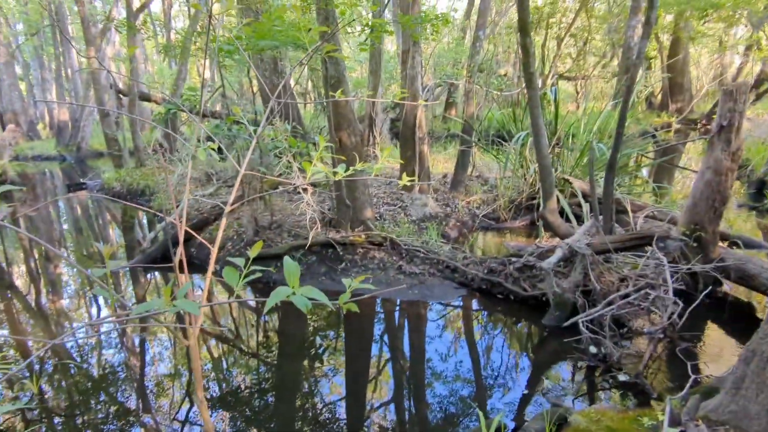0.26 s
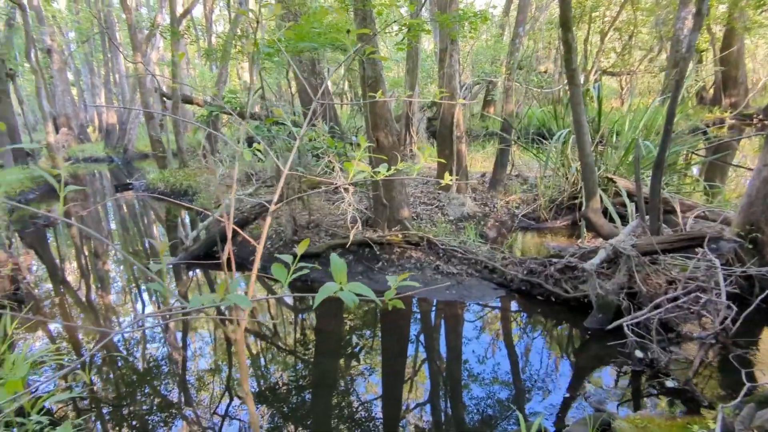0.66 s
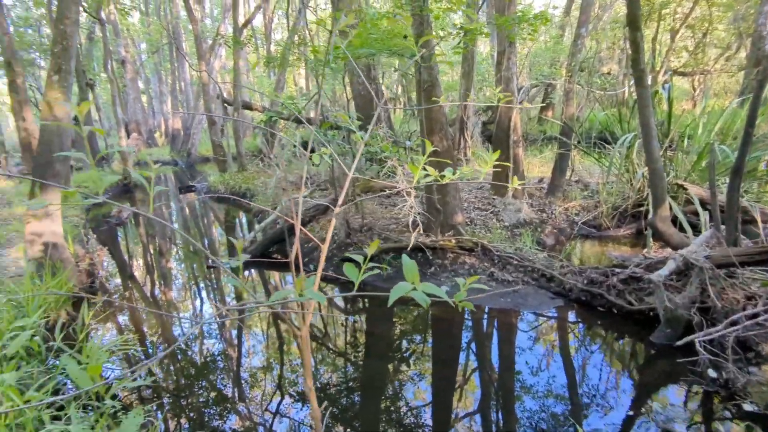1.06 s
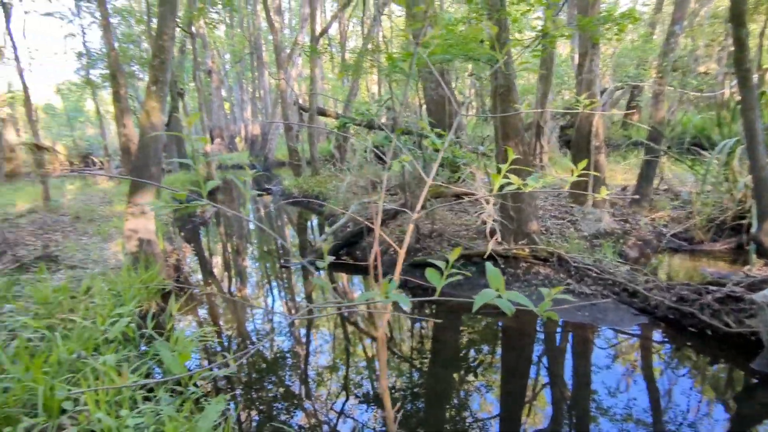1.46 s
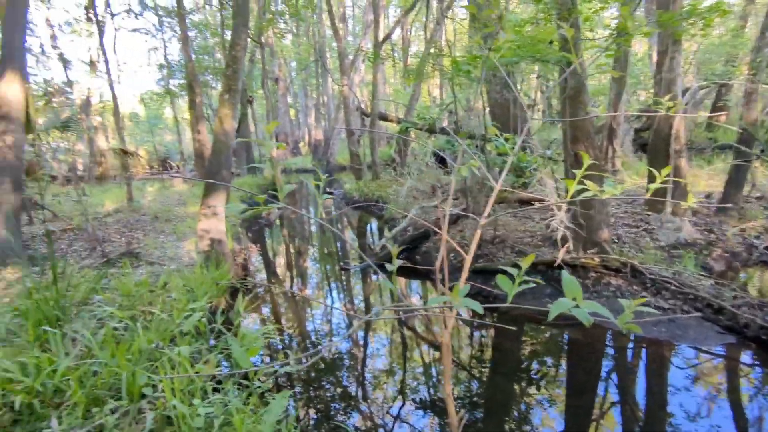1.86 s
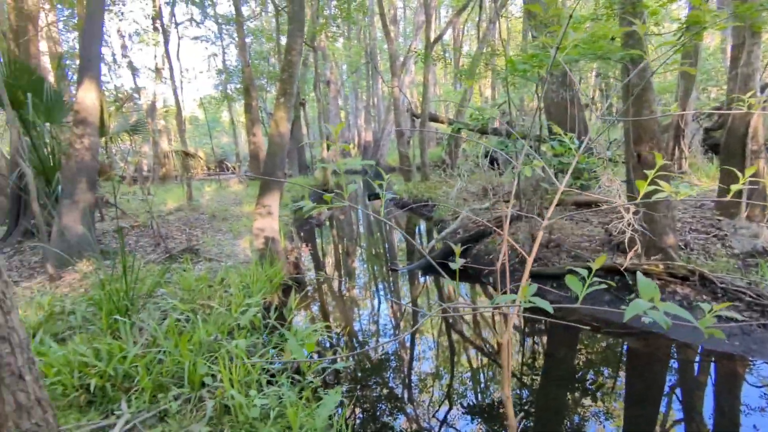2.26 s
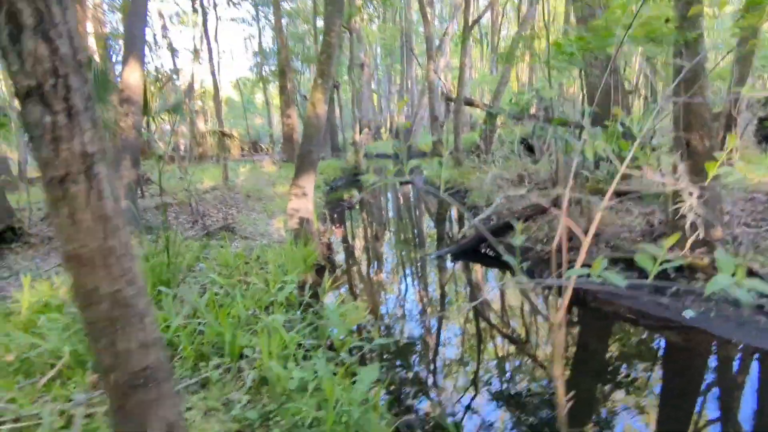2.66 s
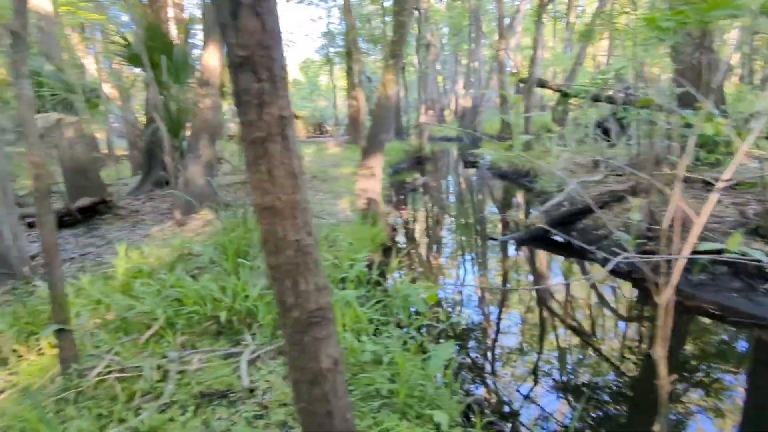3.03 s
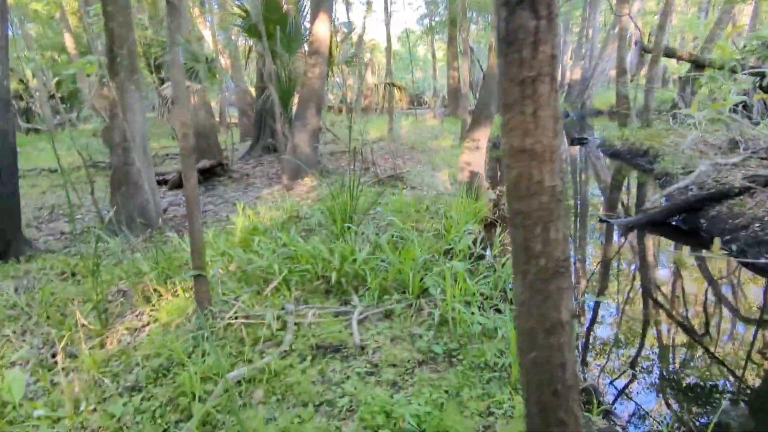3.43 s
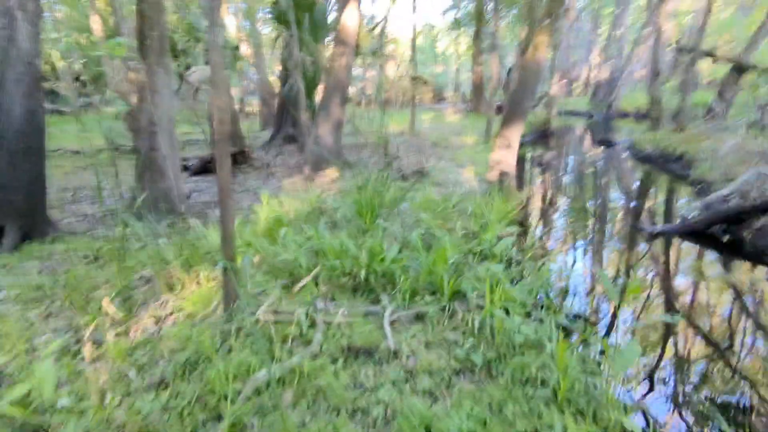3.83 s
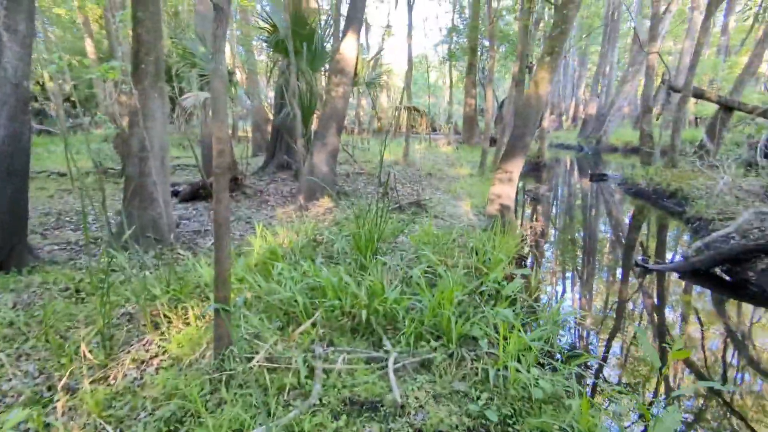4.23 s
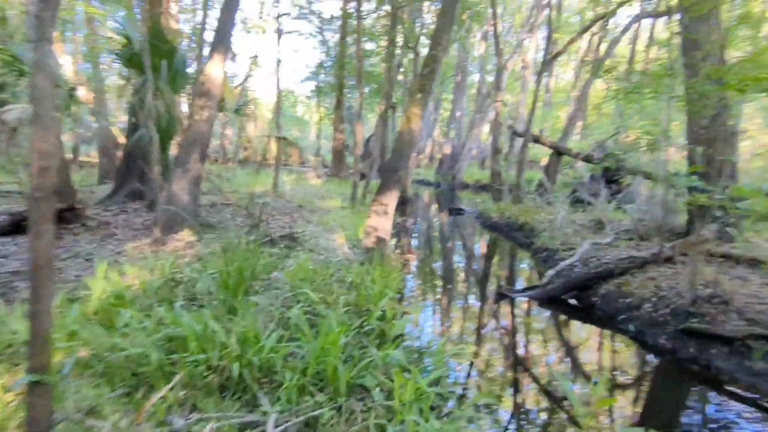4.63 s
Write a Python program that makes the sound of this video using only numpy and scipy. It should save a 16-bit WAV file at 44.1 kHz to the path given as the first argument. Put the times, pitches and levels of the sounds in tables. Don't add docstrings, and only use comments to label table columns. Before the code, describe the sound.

Distant motorway rush and low rumble fill a wooded swamp, with soft crickets chirping, then twigs snapping and dry leaves crackling underfoot close by.

```python
import sys
import numpy as np
from scipy import signal
from scipy.fft import rfft, irfft
from scipy.io import wavfile

SR = 44100
rng = np.random.default_rng(int(sys.argv[2]) if len(sys.argv) > 2 else 0)


def unload_wav(signal):
    wavfile.write(
        sys.argv[1],
        SR,
        np.round(np.clip(np.atleast_2d(signal).T, -1, 1) * 32767).astype(np.int16),
    )


def ratio_of_db(decibels):
    return 10 ** (np.asarray(decibels, float) / 20)


N = 215776

# pitch_hz, share [0-1]
PORT_LIKENESS = [(40, 0.84), (130, 0.98), (190, .9), (270, .9), (370, 0.8), (480, .4), (800, 0.28),
                 (950, 0), (1200, 0.58), (1800, 0.2), (4000, 0.03), (9000, .1)]
# pitch_hz, left_minus_right_db
PORT_BALANCE = [(60, -0.5), (200, 1), (350, -2), (620, 2), (1100, 0.1), (2400, 2), (3300, 3), (4600, 0),
                (12000, 2)]
# pitch_hz, lag_rad
RIGHT_PORT_LAG = [(30, .05), (105, 0.17), (250, 0.15), (400, 0.83), (600, 1.5), (750, 0.27), (1100, 3),
                  (1600, 4.47), (2200, 5.8), (3400, 8.9), (16000, 63)]
# time_s, level_db
TRAFFIC_NEARNESS = [(0, 2), (.5, 2.5), (1.2, 0), (1.7, 2.5), (2.3, 0.5), (2.9, -2), (3.3, -1), (3.7, -2.5),
                    (4.89, 3)]
# pitch_hz, share [dB per dB]
TRAFFIC_SHARE = [(100, 0.4), (250, .9), (700, -0.59), (2500, 1.1)]
# pitch_hz, density_db [dB per Hz]
ROAD_COLOUR = [(13, -53), (22, -20.5), (74, -5), (103, -3.5), (120, -8), (146, -9.5), (269, -19.5),
               (334, -17), (495, -19), (891, -18.5), (1290, -26.5), (1530, -30), (2270, -38.5), (3510, -54),
               (4000, -59), (5200, -90), (8800, -120)]
# time_s, crankshaft_hz, level_db [of its fifth order]
NEAR_TRUCK = [(0, 21.72, -24), (.21, 21.55, -23.5), (.43, 21.35, -26.5), (.85, 21.05, -19.5),
              (1.06, 20.86, -23), (1.28, 20.86, -17), (1.49, 20.6, -19), (1.7, 20.72, -22.5),
              (1.91, 20.38, -21), (2.13, 20.43, -44.5), (2.34, 20.47, -29.5), (2.76, 20.45, -27.5),
              (3.83, 20.18, -29), (4.04, 20.13, -32), (4.25, 20.3, -26), (4.46, 20.28, -48),
              (4.68, 20.4, -38), (4.89, 20.4, -40)]
# time_s, level_db, half_length_s
NEAR_TRUCK_SWELLS = [
    [(.1, -29, 0.39), (.64, -26, 0.18), (1.1, -25, 0.24), (1.8, -37, 0.26), (2.34, -37, 0.1),
     (2.7, -38, 0.24), (3.03, -34, 0.25), (3.6, -32, 0.42), (4.12, -31, 0.3), (4.89, -28, .12)],
    [(.3, -35.5, 0.31), (.73, -32.5, 0.14), (1.16, -34, 0.25), (1.6, -37.5, .25)],
    [(.3, -30.5, 0.33), (1.05, -34, 0.093), (1.6, -42, 0.17), (2.0, -35, 0.27), (2.54, -36, 0.18)],
    [(.3, -46, 0.19), (.85, -42, 0.18)],
]
OTHER_TRUCKS_HZ = [95.25, 82.4, 121.3, 217.3, 129, 152]
# time_s, level_db, half_length_s
OTHER_TRUCK_SWELLS = [
    [(2.2, -30, 0.18), (2.75, -34, 0.17), (3.1, -34.5, 0.24), (3.55, -29.5, 0.28), (4.22, -27.5, 0.26),
     (4.55, -36, 0.18), (4.89, -30.5, 0.24)],
    [(1.6, -40, .15), (2.0, -34, 0.13), (2.45, -33.5, 0.19), (2.8, -46.5, 0.17), (3.2, -36.5, 0.13)],
    [(1.3, -37, 0.097), (1.9, -42, 0.14), (2.2, -37.5, .15)],
    [(3.95, -38, 0.16), (4.2, -36.5, 0.1)],
    [(4.37, -32.5, 0.075), (4.72, -33, 0.15)],
    [(4.37, -35.5, 0.16), (4.75, -34.5, 0.13)],
]
# start_s [first stroke], level_db
CHIRP_RUNS = [(.002, -52.5), (.21, -52.5), (.407, -54), (.812, -53), (.915, -52.5), (1.222, -54.5),
              (1.56, -55), (1.861, -56), (2.293, -55.5), (2.763, -54), (3.062, -54.5), (3.381, -55.5),
              (3.477, -53.5), (3.699, -52.5), (3.898, -54.5), (4.02, -53.5), (4.19, -54.5), (4.486, -59),
              (4.622, -61), (4.744, -58), (4.804, -61), (4.863, -64)]
CHIRP_STROKES = [(3, 5), (3, 5), (5, 4, 4, 4), (4,), (4, 5, 4), (5, 5, 4), (4, 5, 4), (4, 5, 5, 5),
                 (4, 4, 4, 4, 4), (4, 5, 4), (5, 5, 4), (5,), (5, 5), (4, 5), (4,), (3, 4), (4, 4, 5), (6,),
                 (5,), (4,), (2,), (2,)]
# time_s, right_later_ms
MICROPHONE_TURN = [(0, 0.15), (.8, 0.13), (1.0, 0.11), (1.45, .012), (2.75, -0.061), (3.0, -.1),
                   (3.1, -0.15), (3.7, -0.18), (4.25, -0.2)]
# pitch_hz, strokes_per_s, level_db, left_minus_right_db
STEADY_CRICKETS = [
    (4950, 61.0, -68.5, 1.5),
    (4390, 57.0, -68, 4),
    (4010, 39, -66.5, 0.5),
]
# pitch_hz, density_db [dB per Hz]
CHORUS_COLOUR = [(3000, -62.5), (3700, -21), (4200, -1.5), (4550, -6), (4950, -8), (5250, -10),
                 (5600, -30.5), (6500, -59)]
# pitch_hz, density_db [dB per Hz]
AIR_COLOUR = [(3000, -33), (5000, -2.5), (6200, -1), (7900, -9.5), (9200, -2), (10500, -9.5), (12200, -5),
              (13800, -16.5), (15500, -11.5), (17000, -36)]
# time_s, level_db
LORRY_APPROACH = [(3.0, -61), (3.4, -43), (3.75, -40), (4.0, -35.5), (4.2, -33.5), (4.45, -32.5),
                  (4.65, -30.5), (4.89, -33)]
# pitch_hz, density_db [dB per Hz]
LORRY_COLOUR = [(120, -27), (200, -4), (330, -15), (480, -6), (700, 1.5), (900, -3.5), (1300, -8.5),
                (2200, -15.5), (3500, -27.5), (5500, -44), (7000, -55), (9000, -74)]
# start_s, peak_db, ring_hz, wood_db [against the crack]
TWIG_SNAPS = [(3.1062, -51, 6000, 9), (3.1093, -44, 5540, 7), (3.5230, -62, 5774, -6.5),
              (3.5666, -54.5, 6350, -11), (3.5862, -60, 7400, -7), (3.6040, -63, 6000, -9),
              (3.6912, -61.5, 6000, -5), (3.7609, -60.5, 7010, -7), (3.7680, -50, 11990, -10),
              (3.782, -42.5, 9500, 8), (3.9041, -46, 6894, -1), (3.9080, -47, 13000, -9),
              (3.946, -54, 9140, -12.5), (4.0027, -55.5, 11480, -12), (4.1844, -59.5, 6080, -15),
              (4.7827, -49.5, 11000, 9), (4.7843, -35, 11100, 4), (4.803, -45, 6800, 4.5),
              (4.825, -49.5, 6070, 10.5), (4.8268, -51.5, 6000, 6), (4.8300, -42, 11480, -1),
              (4.8610, -56.5, 12060, -9.5)]
# full_from_s [the attack comes before it], level_db, attack_s, hold_s
LEAF_STIRS = [(3.113, -72, .003, 0), (3.308, -70.5, 0.11, .02), (3.57, -84.5, 0.092, 0.2),
              (3.783, -54, 0.034, .11), (3.972, -69.5, .05, .1), (4.054, -76.5, 0.09, .7),
              (4.17, -74, .1, .04), (4.44, -72, 0.16, 0), (4.559, -67.5, .12, .02), (4.72, -64, 0.11, 0.01),
              (4.79, -56, 0.0046, 0.03), (4.854, -60, .05, .01)]
# pitch_hz, density_db [dB per Hz]
LEAF_COLOUR = [(1500, -20), (3000, 4), (5500, -3), (6900, -5), (8000, -8), (10000, -3.5), (12300, -2.5),
               (13800, -8.5), (15200, -6.5), (17000, -28.5)]

ROAD_DB, CHORUS_DB, AIR_DB = -28, -63, -79
MAIN_ORDER, WEAK_ORDERS = 5, (3, 7, 8, 10)
OTHER_SAG_HZ_PER_S = 0.4004
STROKE_S, STROKE_GAP_S, CHIRP_PAUSE_S = .0115, .0181, .0408
STROKE_FROM_HZ, STROKE_TO_HZ = 5120, 4200
CHIRP_SCATTER_DB, CHIRP_PAN_DB = .4, 1.2
LORRY_SIDE = -0.5
WOOD_HZ, WOOD_SPREAD, SNAP_PAN_DB = 3550, 0.12, 3.5
STIR_RISE_DB, STIR_FALL_DB_PER_S = 20.5, 221.5
MIC_LOW_CUT_HZ = 43


def rms_one(x):
    return x / np.sqrt(np.mean(x ** 2) + 1e-20)


def in_time(rows):
    time_s, *columns = np.transpose(rows)
    return [np.interp(np.arange(N) / SR, time_s, column) for column in columns]


def at_hz(points, hz):
    table_hz, values = np.transpose(points)
    return np.interp(np.log(hz), np.log(table_hz), values)


def drift(rate_hz):
    pole = np.exp(-80 * np.pi * rate_hz / SR)
    noise = rng.standard_normal(N // 40 + 2002)
    slow = signal.lfilter([1], [1, -2 * pole, pole * pole], noise)[2000:]
    return np.interp(np.arange(N) / 40, np.arange(len(slow)), rms_one(slow))


def panned(db):
    return ratio_of_db(np.array([db / 2, -db / 2]))


def diffuse(source, colour, side=1):
    hz = np.maximum(np.arange(N // 2 + 1) * SR / N, 1)
    common, *own = rfft(source)
    alike = np.clip(at_hz(PORT_LIKENESS, hz), 0, 1)
    lag = side * at_hz(RIGHT_PORT_LAG, hz) * [[0], [1]]
    ports = np.sqrt(alike) * common * np.exp(-1j * lag) + np.sqrt(1 - alike) * np.array(own)
    ports = ports * ratio_of_db(at_hz(colour, hz)) * panned(at_hz(PORT_BALANCE, hz))
    return hz, ports / np.sqrt(np.mean(irfft(ports, N) ** 2))


def hiss(colour):
    return irfft(diffuse(rng.standard_normal((3, N)), colour)[1], N)


def road(patchy_db):
    hz, ports = diffuse(rng.standard_normal((3, N)), ROAD_COLOUR)
    near_db, = in_time(TRAFFIC_NEARNESS)
    half_octaves = 2 * np.log2(hz / 25)
    together = drift(1.5)
    out = 0
    for k in range(17):
        swell_db = near_db * at_hz(TRAFFIC_SHARE, 25 * 2 ** (k / 2))
        overlap = np.clip(1 - abs(half_octaves - k), 0, 1)
        waver_db = patchy_db * (0.21 * together + drift(1.8))
        out = out + irfft(ports * overlap, N) * ratio_of_db(swell_db + waver_db)
    return out * ratio_of_db(ROAD_DB)


def exhaust(hz, gain, wobble_hz):
    cycles = np.cumsum(hz + wobble_hz * drift(3.6)) / SR + rng.random()
    lag = at_hz(RIGHT_PORT_LAG, hz) * [[0], [1]]
    return np.sqrt(2) * gain * np.sin(2 * np.pi * cycles - lag)


def swells(rows):
    t = np.arange(N) / SR
    return sum(ratio_of_db(db) * np.exp(-((t - s) / half_s) ** 2) for s, db, half_s in rows)


def trucks(wobble_hz):
    shaft_hz, main_db = in_time(NEAR_TRUCK)
    tones = [(MAIN_ORDER * shaft_hz, ratio_of_db(main_db))]
    for order, rows in zip(WEAK_ORDERS, NEAR_TRUCK_SWELLS):
        tones.append((order * shaft_hz, swells(rows)))
    sag_hz = OTHER_SAG_HZ_PER_S * np.arange(N) / SR
    for hz, rows in zip(OTHER_TRUCKS_HZ, OTHER_TRUCK_SWELLS):
        tones.append((hz - sag_hz, swells(rows)))
    return sum(exhaust(hz, gain, wobble_hz) for hz, gain in tones)


def wing_stroke(t, octave_db):
    part = np.clip(t / STROKE_S, 0, 1)
    fall_hz_per_s = (STROKE_TO_HZ - STROKE_FROM_HZ) / STROKE_S
    phase = 2 * np.pi * (STROKE_FROM_HZ * t + fall_hz_per_s * t ** 2 / 2)
    return np.abs(np.sin(np.pi * part)) * (np.sin(phase) + ratio_of_db(octave_db) * np.sin(2 * phase))


def among_trunks(x, echo_db):
    tail = rng.standard_normal((2, 2000)) * np.exp(-np.arange(2000) / (0.0097 * SR))
    path = ratio_of_db(echo_db) * tail / np.sqrt(np.sum(tail ** 2, axis=1, keepdims=True))
    path[:, 0] = 1
    return signal.fftconvolve(x, path, axes=1)


def cricket(lift_db, first_db, uneven_db, octave_db, echo_db):
    out = np.zeros((2, N + 2000))
    t = np.arange(600) / SR - .0003
    for (first_s, run_db), chirps in zip(CHIRP_RUNS, CHIRP_STROKES):
        for strokes in chirps:
            luck = rng.standard_normal((8, 3))
            lag_s = np.interp(first_s, *np.transpose(MICROPHONE_TURN)) / 1000
            stroke = wing_stroke(t - lag_s / 2 * np.array([[-1], [1]]), octave_db)
            stroke = panned(CHIRP_PAN_DB * luck[7, 0])[:, None] * stroke
            chirp_db = run_db + lift_db + CHIRP_SCATTER_DB * luck[7, 1]
            for k in range(strokes):
                start_s = first_s + k * STROKE_GAP_S - .0003 - STROKE_S / 2
                at = 1000 + int(start_s * SR + 10 * luck[k, 2])
                stroke_db = chirp_db + first_db * (k == 0) + uneven_db * luck[k, :2, None]
                out[:, at:at + 600] += stroke * ratio_of_db(stroke_db)
            first_s = first_s + (strokes - 1) * STROKE_GAP_S + CHIRP_PAUSE_S
    return among_trunks(out, echo_db)[:, 1000:1000 + N]


def neighbours(fall_hz, waver_db):
    out = 0
    for hz, per_s, db, pan_db in STEADY_CRICKETS:
        part = (np.cumsum(per_s * (1 + 0.075 * drift(5.0))) / SR + rng.random()) % 1
        pitch_hz = hz + 60 * drift(8.0) + fall_hz * (.3 - part)
        phase = 2 * np.pi * (np.cumsum(pitch_hz) / SR + rng.random((2, 1)))
        gate = np.sin(np.pi * np.clip(part / 0.78, 0, 1))
        level = ratio_of_db(db + waver_db * drift(2.1)) * panned(pan_db)[:, None]
        out = out + level * gate * np.sin(phase)
    return out


def far_chorus():
    return ratio_of_db(CHORUS_DB + 0.56 * drift(6.6)) * hiss(CHORUS_COLOUR)


def air():
    return ratio_of_db(AIR_DB + 1.5 * drift(4.0)) * hiss(AIR_COLOUR)


def lorry():
    ports = diffuse(rng.standard_normal((3, N)), LORRY_COLOUR, LORRY_SIDE)[1]
    return ratio_of_db(in_time(LORRY_APPROACH)[0] + 0.99 * drift(5.0)) * irfft(ports, N)


def twigs(crack_s, ring_s, ring_db, lift_db):
    out = np.zeros((2, N + 600))
    t = np.arange(600) / SR
    bright = signal.butter(1, [2200, 14000], "band", fs=SR, output="sos")
    ring_shape = np.exp(-t / ring_s) * np.minimum(t / 0.00015, 1)
    for s, db, ring_hz, wood_db in TWIG_SNAPS:
        noise, luck = rng.standard_normal((3, 600)), rng.standard_normal(2)
        burst = 0.3 * noise[0] + 1.1 * noise[1:]
        crack = signal.sosfilt(bright, burst * np.exp(-t / crack_s))
        ring = ratio_of_db(ring_db) * np.sin(2 * np.pi * ring_hz * t)
        wood_hz = WOOD_HZ * np.exp(WOOD_SPREAD * luck[0])
        wood = ratio_of_db(wood_db) * np.sin(2 * np.pi * wood_hz * t + [[0], [1.6]])
        level = ratio_of_db(db + lift_db) * panned(SNAP_PAN_DB * luck[1])[:, None]
        at = int(s * SR)
        out[:, at:at + 600] += level * (crack + (ring + wood) * ring_shape)
    return out[:, :N]


def leaves(per_s, size_db, smooth):
    struck = rng.random((3, N)) < per_s * ratio_of_db(5.0 * drift(30)) / SR
    grains = struck * ratio_of_db(size_db * np.minimum(rng.exponential(1, (3, N)), 4))
    source = (rms_one(grains) + smooth) * rng.standard_normal((3, N))
    t = np.arange(N) / SR
    stir = 0
    for s, db, attack_s, hold_s in LEAF_STIRS:
        rise_db = STIR_RISE_DB * np.maximum(s - t, 0) / max(attack_s, .002)
        fall_db = STIR_FALL_DB_PER_S * np.maximum(t - s - hold_s, 0)
        stir = stir + ratio_of_db(db - rise_db - fall_db)
    return stir * irfft(diffuse(source, LEAF_COLOUR)[1], N)


def scene():
    traffic = road(patchy_db=0.57) + trucks(wobble_hz=0.29) + lorry()
    insects = cricket(lift_db=3, first_db=-3, uneven_db=1.0, octave_db=-31, echo_db=-7)
    insects = insects + neighbours(fall_hz=499, waver_db=3.5) + far_chorus()
    steps = twigs(crack_s=0.00092, ring_s=0.00063, ring_db=-2, lift_db=2.5)
    steps = steps + leaves(per_s=2200, size_db=2.0, smooth=.45)
    return traffic + insects + air() + steps


def low_pass(x):
    return signal.sosfilt(signal.butter(12, 15830, fs=SR, output="sos"), x)


def record(dry):
    low_cut = signal.butter(2, MIC_LOW_CUT_HZ, "high", fs=SR, output="sos")
    mix = signal.sosfilt(low_cut, dry)
    return low_pass(mix)


dry = scene()
out = record(dry)
unload_wav(out)
```